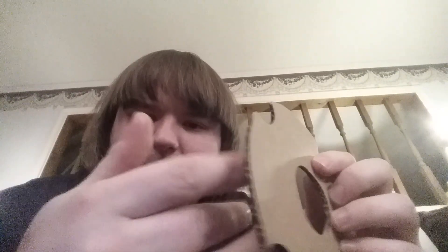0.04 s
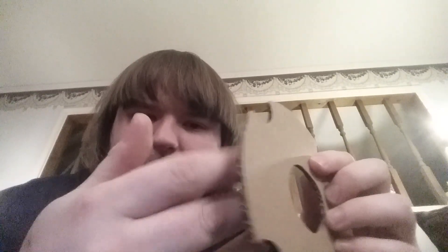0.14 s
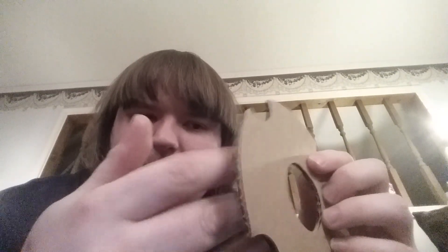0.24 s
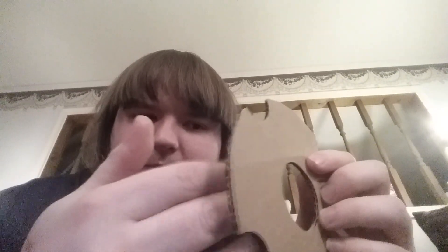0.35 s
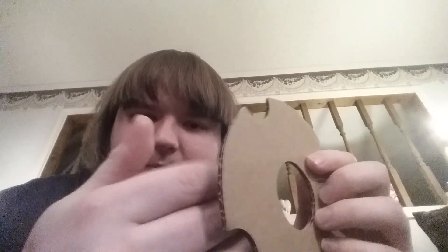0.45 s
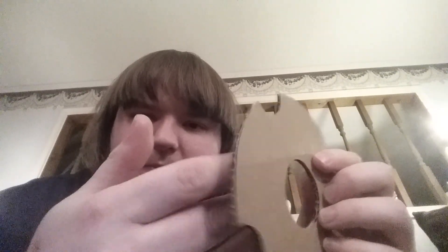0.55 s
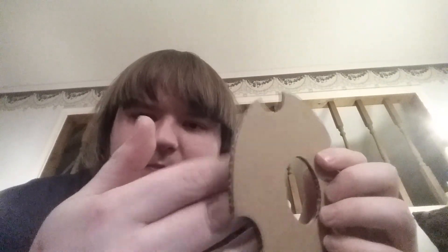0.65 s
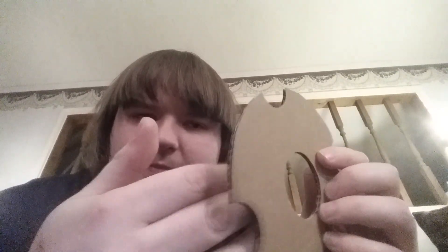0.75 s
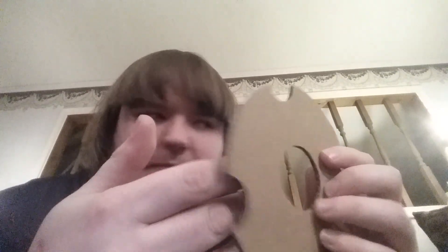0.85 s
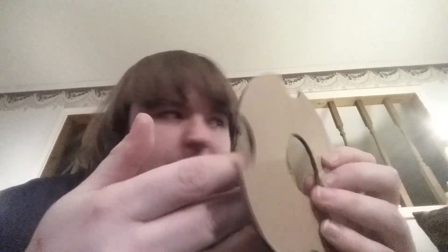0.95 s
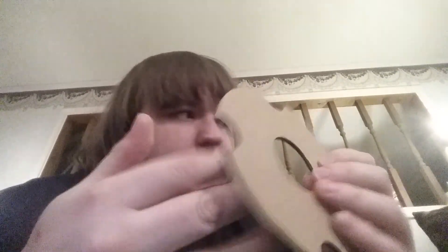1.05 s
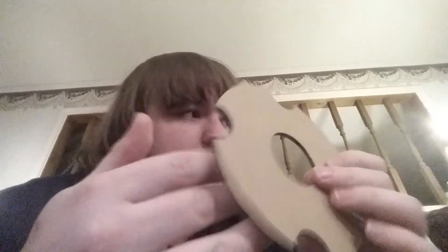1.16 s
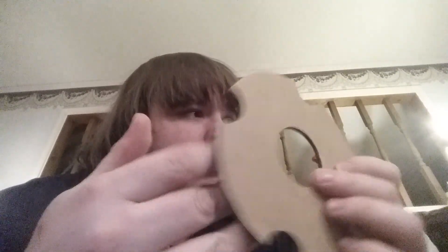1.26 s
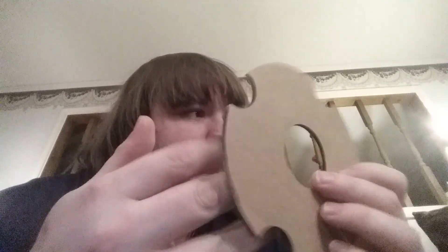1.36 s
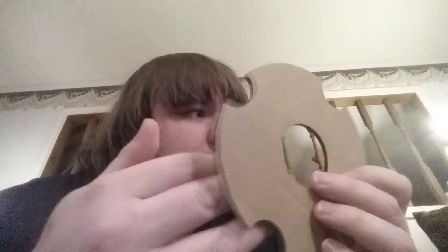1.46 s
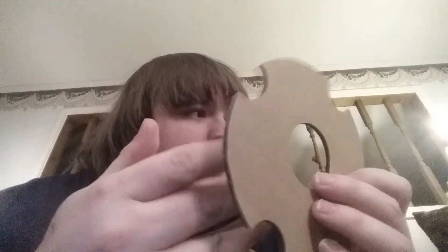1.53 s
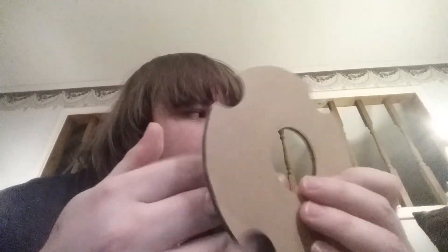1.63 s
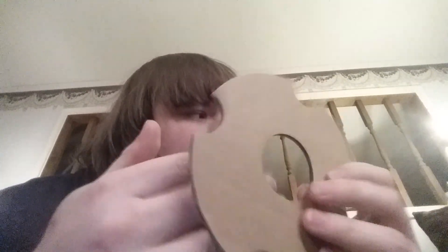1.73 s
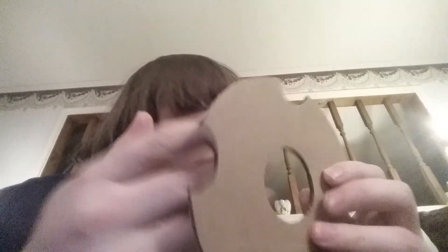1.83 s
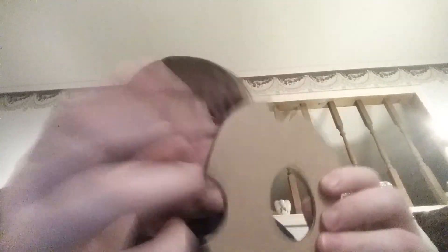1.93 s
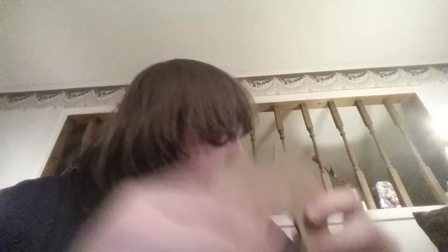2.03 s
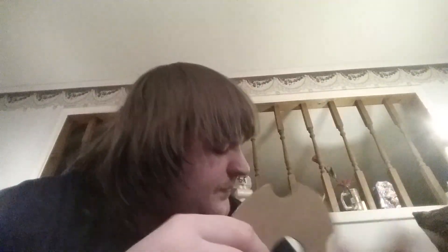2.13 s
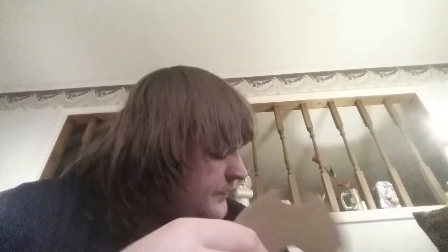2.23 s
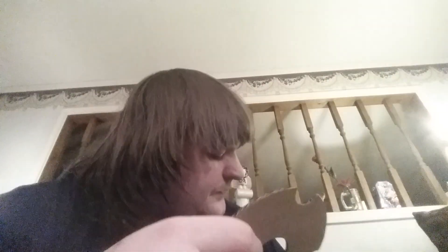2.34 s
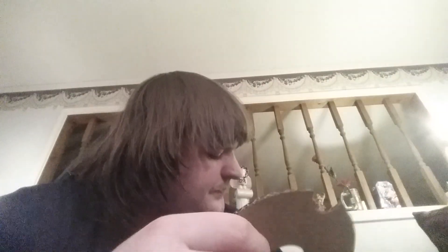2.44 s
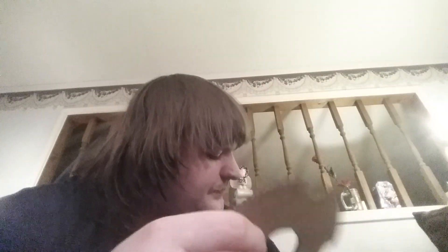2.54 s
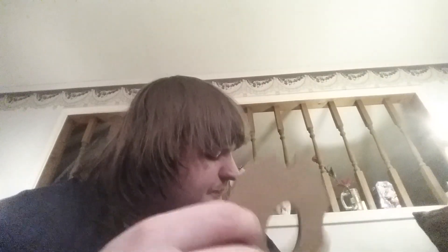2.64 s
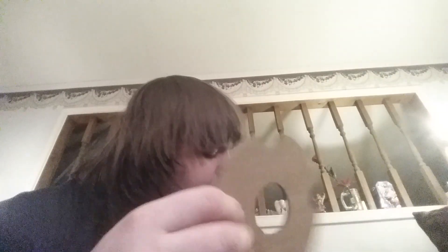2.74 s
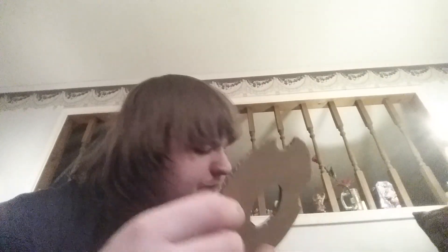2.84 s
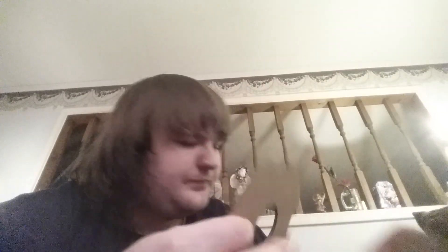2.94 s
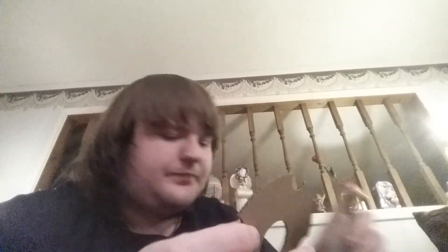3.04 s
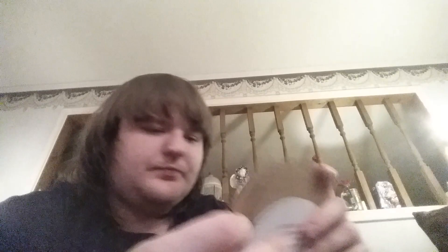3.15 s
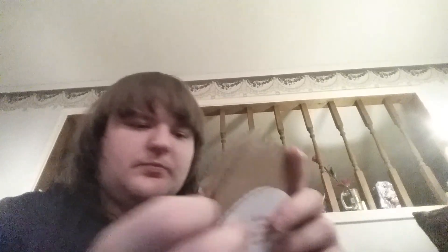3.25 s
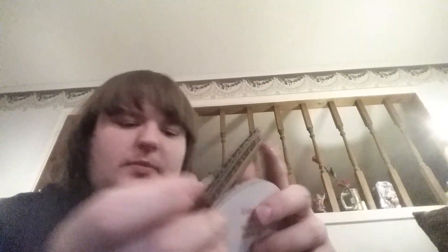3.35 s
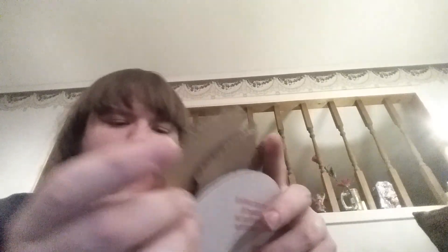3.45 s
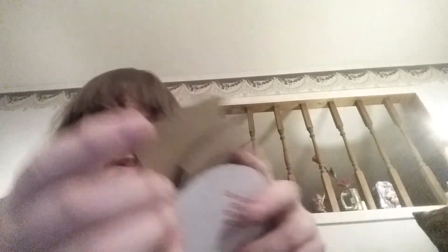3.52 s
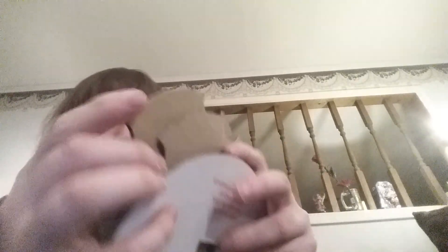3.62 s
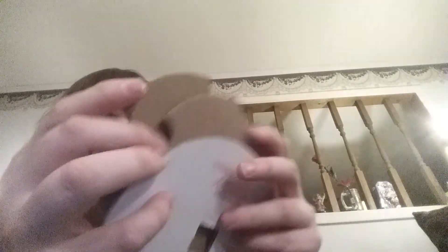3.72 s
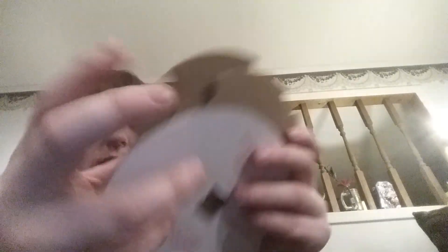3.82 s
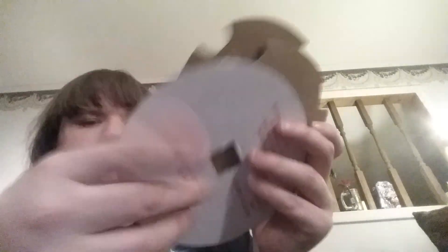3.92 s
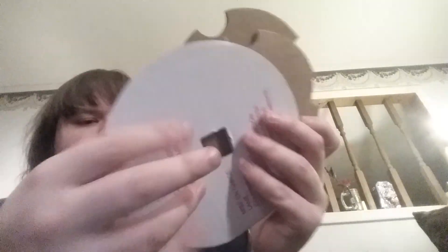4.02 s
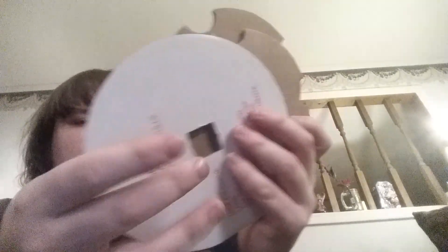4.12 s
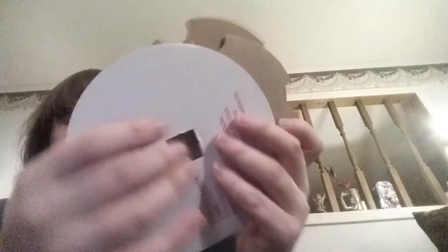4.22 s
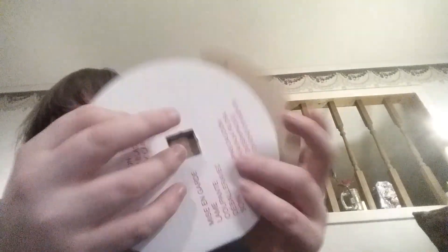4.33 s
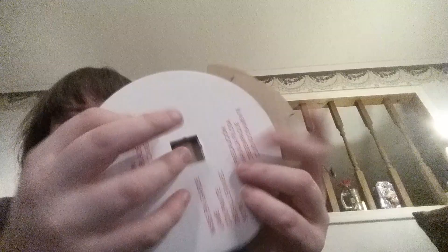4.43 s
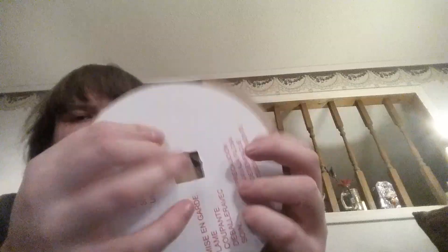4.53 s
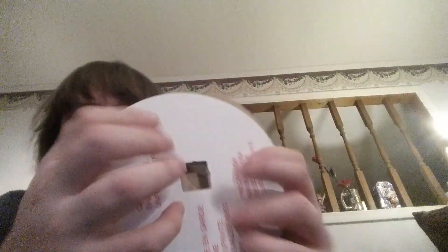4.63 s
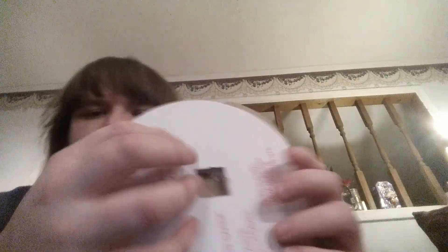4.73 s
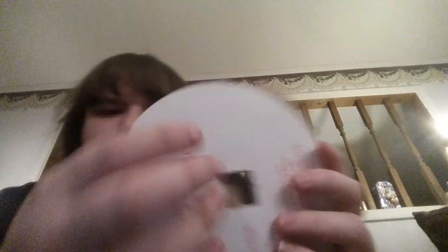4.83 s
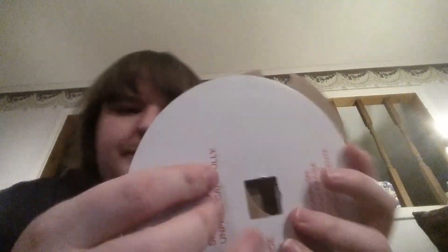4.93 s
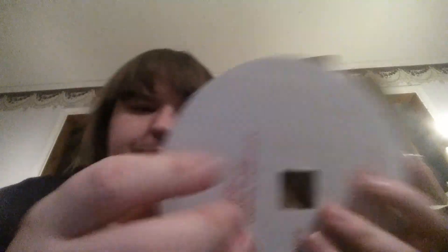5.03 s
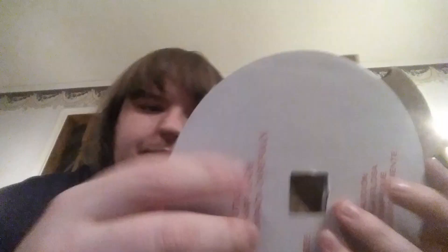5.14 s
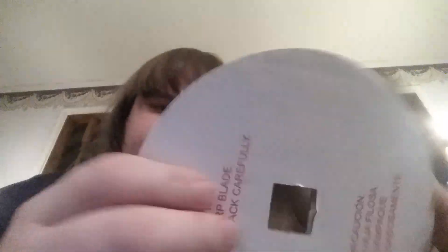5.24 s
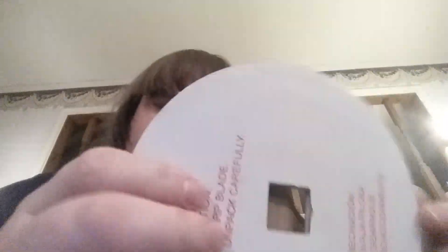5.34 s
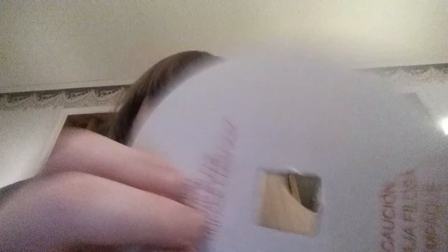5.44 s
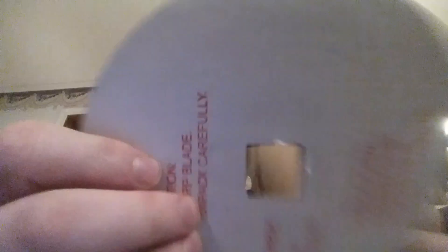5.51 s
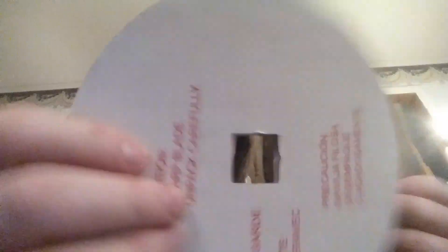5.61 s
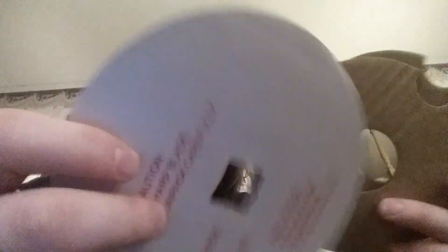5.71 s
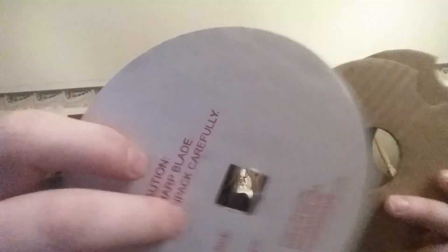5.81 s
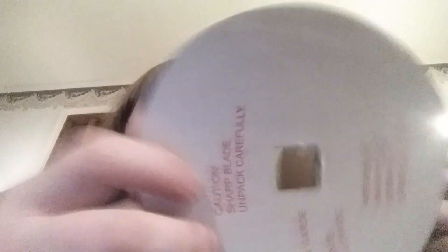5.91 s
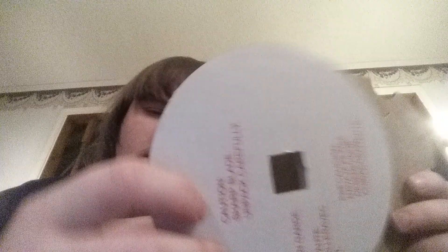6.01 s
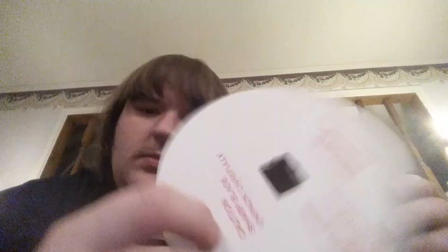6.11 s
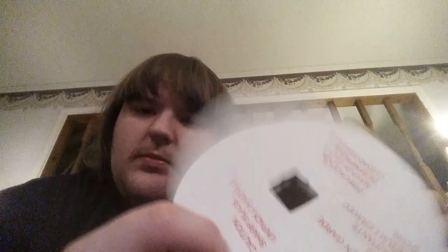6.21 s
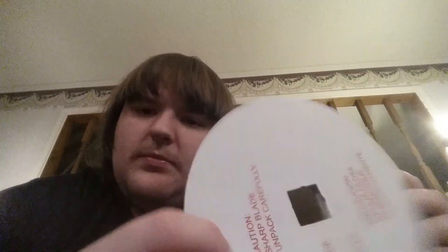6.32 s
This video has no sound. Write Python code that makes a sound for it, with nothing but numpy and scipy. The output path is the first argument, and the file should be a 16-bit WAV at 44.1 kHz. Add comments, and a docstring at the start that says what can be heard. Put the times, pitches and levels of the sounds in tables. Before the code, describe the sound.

First, fast uneven nail taps on stiff card, each very short and woody with a sharp click. Then a soft thump, light brushing, and a sudden clack as discs are picked up. Papery sliding, hollow rubbing and clustered knocks follow, louder and rougher. Close-miked, stronger and earlier on the left, duller on the right, with little room reverberation.

```python
"""A quiet room: fingernails drum on a cardboard disc held near two unlike microphones.
Then the hands pick up a stack of discs, which slide, scuff and knock against each other.
Taps and knocks sum decaying card modes, a slow flex and a noise tick; sliding is grainy shaped noise,
hollow at times. Room reflections and steady air noise lie behind, and each microphone adds its colour."""
import sys
import numpy as np
from scipy import signal
from scipy.fft import rfft, irfft
from scipy.io import wavfile
from scipy.ndimage import uniform_filter1d

SR = 44100
rng = np.random.default_rng(int(sys.argv[2]) if len(sys.argv) > 2 else 0)


def waveform_to_disk(signal):
    """Save audio, clipped to [-1, 1], as 16-bit WAV at the path in sys.argv[1]."""
    frames = np.transpose(np.atleast_2d(signal))
    scaled = np.clip(frames, -1, 1) * 32767
    samples = np.round(scaled).astype(np.int16)
    wavfile.write(sys.argv[1], SR, samples)


N = 280872  # length of the scene in samples


def gain_of(db):
    """Turn decibels into an amplitude factor."""
    return 10 ** (np.asarray(db) / 20)


def evened(x):
    """Scale a signal to an RMS of one."""
    return x / np.sqrt(np.mean(x ** 2) + 1e-20)


def read(points, hz):
    """Read a table of (Hz, value) along a logarithmic frequency axis."""
    f, value = np.transpose(points)
    return np.interp(np.log(hz + 1), np.log(f + 1), value)


def over_time(points, t):
    """Read a table of (seconds, value) along straight lines."""
    return np.interp(t, *np.transpose(points))


def add(mix, s, sound):
    """Lay a two-channel sound into the mix at s seconds, cut at the end of the scene."""
    part = mix[:, round(s * SR):][:, :sound.shape[1]]
    part += sound[:, :part.shape[1]]


# How alike the two microphone ports hear a sound. Each row: frequency in Hz, likeness from 0 to 1.
PORT_LIKENESS = [(100, 1), (700, .9), (2000, 0.34), (5000, 0.17)]


def pair(a, b):
    """Left is a; right shares a by the likeness of the ports and takes the rest from b."""
    same = np.clip(read(PORT_LIKENESS, np.fft.rfftfreq(len(a), 1 / SR)), 0, 1)
    right = same * rfft(a) + np.sqrt(1 - same ** 2) * rfft(b)
    return np.array([a, irfft(right, len(a))])


def noise(colour, patchy_db):
    """Two-port noise from random short-time spectra with drifting patches, scaled to an RMS of one."""
    hz = np.fft.rfftfreq(512, 1 / SR)
    a, b, c, d, patches = rng.standard_normal((N // 128 + 5, 257, 5)).T
    patches = uniform_filter1d(patches, size=12, axis=0)  # smooth over frequency
    patches = evened(uniform_filter1d(patches, size=9, axis=1))  # and over time
    spectra = np.array([a + 1j * b, c + 1j * d])
    spectra = spectra * gain_of(read(colour, hz)[:, None] + patchy_db * patches)
    ports = signal.istft(spectra, nperseg=512, noverlap=384)[1][:, :N]
    return evened(pair(*ports))


BLOW_LENGTH = 4096  # samples
CHANCES = 72 + 2 * BLOW_LENGTH  # random numbers for one blow: 72 for the modes, the rest for the tick


def card_ring(modes_hz, decay, manner, ring_hz, chance):
    """Close, heavily damped card modes, rung unevenly by where the card is hit, strongest near ring_hz."""
    t = np.arange(BLOW_LENGTH) / SR
    loose, spread_db, lead, scatter_s = manner
    spot, detune, other = chance[:72].reshape(3, 24, 1)[:, :len(modes_hz) + 1]
    hz = np.append(ring_hz, modes_hz * (1 + loose * detune[1:, 0]))[:, None]
    share = np.append(lead, 1 + 0.7 * np.tanh(spot[1:]))[:, None]
    distance_db = spread_db * np.log2(hz / ring_hz) ** 2
    fade = share * gain_of(-distance_db - 60 * t / read(decay, hz))
    turn = 2 * np.pi * hz * t
    left = (fade * np.sin(turn)).sum(0)
    unlike = (fade * np.sin(turn + .5 * other)).sum(0) * (1 - np.exp(-t / 0.0032))
    # the faces meet again in a few more places
    contacts = 0.7 * (abs(chance[72:584]) > 2.3) * np.exp(-t[:512] / scatter_s)
    contacts[0] = 1
    return signal.oaconvolve(pair(left, unlike), contacts[None], axes=1)[:, :BLOW_LENGTH]


def card_flex(flex_hz, detune):
    """The card bends slowly as a whole and loses 60 dB in about three cycles."""
    t = np.arange(BLOW_LENGTH) / SR
    flex = np.sin(2 * np.pi * flex_hz * t * [[1], [1 + 0.29 * detune]])
    return flex * gain_of(-60 * t * flex_hz / 2.98) * (1 - np.exp(-t / 0.0015))


def contact_tick(scatter_s, grit):
    """High-passed noise: a short burst, a weaker tail, and a faint rustle until the finger leaves."""
    t = np.arange(BLOW_LENGTH) / SR
    rustle = 0.01 / (1 + np.exp((t - .05) / 0.0027))  # ends near 50 ms
    burst = (1 - np.exp(-t / 0.00031)) * gain_of(-60 * t / (0.0018 + 1.15 * scatter_s))
    burst = burst + 0.35 * gain_of(-60 * t / 0.015)
    b, a = signal.butter(2, 3300, "high", fs=SR)
    return pair(*signal.lfilter(b, a, grit.reshape(2, -1) * (burst + rustle)))


def blow(modes_hz, decay, manner, sign, ring_db, flex_db, tick_db, flex_hz, ring_hz, chance):
    """One contact: ring, flex and tick, each set to its peak level in the near port."""
    ring = card_ring(modes_hz, decay, manner, ring_hz, chance)
    flex = card_flex(flex_hz, chance[71])
    tick = contact_tick(manner[3], chance[72:])
    parts = (ring_db, sign * ring), (flex_db, sign * flex * [[1], [.9]]), (tick_db, tick)
    return sum(gain_of(level_db) * part / abs(part[0]).max() for level_db, part in parts)


# Fingers on the single disc, close to the microphones. Each row: start in seconds, ring level in dB,
# flex level in dB, nail tick level in dB, frequency of the lead mode in Hz.
FINGER_TAPS = [(0.0822, -22.5, -36, -19.5, 807), (0.1101, -14.5, -23.5, -11, 678),
               (0.1987, -15.5, -24.5, -13, 872), (0.2335, -14.5, -35, -9, 839),
               (0.3237, -16, -25, -15, 829), (0.3473, -14, -21, -12.5, 538), (0.3697, -10, -26, -9.5, 882),
               (0.4517, -15, -30, -16, 430), (0.4599, -13, -35, -10.5, 490),
               (0.4841, -17, -13.5, -14.5, 527), (0.511, -11, -34, -12, 900),
               (0.5775, -10.5, -43, -12.5, 400), (0.5957, -11.5, -28, -9, 850),
               (0.6209, -23, -18.5, -20, 500), (0.6474, -10.5, -28, -5, 930), (0.7258, -16, -38, -18, 419),
               (0.7372, -14.5, -29, -14, 839), (0.7668, -30, -21, -25, 500), (0.7907, -8, -23, -8, 915),
               (0.8557, -13, -23, -12, 380), (0.8932, -17, -26, -20, 495), (0.9423, -7.5, -17.5, -8.5, 516),
               (0.9961, -10, -27, -14, 775), (1.0416, -19.5, -20, -15.5, 462),
               (1.1708, -17, -26, -11, 1230), (1.197, -17.5, -31, -11.5, 470),
               (1.2796, -13.5, -25, -17.5, 400), (1.3272, -11, -24, -8.5, 600),
               (1.3401, -11.5, -48, -8.5, 480), (1.4055, -15, -25, -17, 300), (1.4578, -24, -17, -25, 300),
               (1.4995, -8.5, -43, -10, 904), (1.579, -20.5, -24, -27, 450),
               (1.6001, -23.5, -17.5, -25.5, 300), (1.6283, -8.5, -40, -9, 893),
               (1.7255, -11.5, -45, -16, 280), (1.7516, -18.5, -20, -20, 279),
               (1.7717, -13, -21, -12.5, 460), (1.8424, -25.5, -23, -19.5, 1200),
               (1.8918, -31, -22.5, -24, 300), (1.9314, -10.5, -22.5, -10, 570),
               (2.1273, -22, -24, -23.5, 590), (2.1734, -18, -25, -17.5, 1744)]
# How fast the disc dies away. Each row: frequency in Hz, time to fall 60 dB in seconds.
DISC_DECAY = [(250, 0.034), (900, 0.016), (4500, 0.0055)]
# The modes of the disc before each tap detunes them, in Hz.
DISC_MODES = [300, 480, 670, 860, 1190, 1480, 1950, 2180, 2800, 3300, 4200]
# How a tap excites the disc. In order: looseness of the modes' pitch as a fraction, loss in dB one octave
# from the lead mode (growing with the square of octaves), strength of the lead mode,
# time constant of later contacts in seconds.
DISC_MANNER = (.04, 1.1, 1.7, .00035)
DISC_FLEX_HZ = 185  # centre; each tap varies it by up to a quarter


def finger_taps():
    """Single clean contacts of the nails, each ringing and flexing the one disc."""
    out = np.zeros((2, N))
    chances = rng.standard_normal((len(FINGER_TAPS), CHANCES))
    for (s, *levels_db, ring_hz), chance in zip(FINGER_TAPS, chances):
        flex_hz = DISC_FLEX_HZ * (1 + 0.25 * np.tanh(chance[0]))
        add(out, s, blow(DISC_MODES, DISC_DECAY, DISC_MANNER, 1, *levels_db, flex_hz, ring_hz, chance))
    return out


# Discs and fingers knocking in the stack. Each row: start in seconds, ring level in dB, flex level in dB,
# tick level in dB, flex frequency in Hz, frequency around which the blow rings most in Hz.
STACK_KNOCKS = [(2.021, -9.5, -7, -18, 135, 549), (2.0498, -28, -9, -24, 120, 600),
                (2.0714, -28.5, -38, -8, 75.0, 2250), (2.5718, -30, -36, -35, 151.0, 480),
                (2.9781, -17, -19, -14, 190, 968), (3.2, -25.5, -26, -20.5, 160, 1160),
                (3.2614, -18.5, -25, -20, 352, 1130), (3.3702, -3.5, -22, -13, 133, 1248),
                (3.7733, -7, -30, -4, 480, 1400), (3.871, -21, -30, -19, 97.0, 780),
                (3.8925, -11, -16, -20, 208, 750), (4.0492, -17.0, -14.5, -13, 100, 1050),
                (4.0551, -12, -31, -19, 167, 1450), (4.064, -11, -4.5, -21, 146, 1030),
                (4.3478, -10, -11, -11.5, 151.0, 1120), (4.5179, -17.5, -53, -38, 388.0, 1800),
                (4.5255, -17, -50, -28, 300, 1210), (4.5345, -14, -50, -28, 300, 1200),
                (4.5612, -18, -19.5, -28, 86.0, 1200), (4.574, -16, -27, -21, 97.0, 1150),
                (4.6241, -15.5, -10.5, -15, 128, 1010), (4.6673, -16.5, -40, -17, 75.0, 1250),
                (4.7709, -19.5, -13, -18, 122, 1470), (4.8356, -16, -37.0, -4.5, 334.0, 2020),
                (4.9948, -15.0, -14, -30, 98, 1370), (5.0304, -22, -7.5, -16.5, 138, 830),
                (5.1847, -27, -15.5, -34, 105, 1230), (5.2215, -27, -9.5, -14.5, 123, 1560),
                (5.5758, -11.5, -30, -9.5, 86.0, 839), (5.7821, -10, -5.5, -16, 153, 460),
                (5.829, -12.5, -19, -29, 170, 1340), (5.877, -16.5, -12, -39, 152, 980),
                (6.05, -13, -29, -15, 242.0, 1400), (6.0896, -6, -27, -20, 420, 720),
                (6.1876, -8.5, -17, -10.5, 430, 900), (6.2444, -17, -24, -22, 168, 581),
                (6.2535, -17, -20, -30, 380, 600), (6.325, -9, -14, -6.5, 370, 1100)]
# How fast the stack dies away. Each row: frequency in Hz, time to fall 60 dB in seconds.
STACK_DECAY = [(250, 0.058), (900, 0.019), (4500, 0.0069)]
STACK_MODES = np.geomspace(240, 4500, 23)  # Hz, before each knock detunes them
# How a knock excites the stack, in the same order as for the disc.
STACK_MANNER = (.062, 4.2, 2.8, .0035)
# Between these times the stack moves away from the microphones on each knock.
TURNED_FROM_S, TURNED_UNTIL_S = 2.3, 5.7


def stack_knocks():
    """Clusters of contacts in the stack; the sign of ring and flex follows the way the stack moves."""
    out = np.zeros((2, N))
    chances = rng.standard_normal((len(STACK_KNOCKS), CHANCES))
    for (s, *row), chance in zip(STACK_KNOCKS, chances):
        sign = -1 if TURNED_FROM_S < s < TURNED_UNTIL_S else 1
        add(out, s, blow(STACK_MODES, STACK_DECAY, STACK_MANNER, sign, *row, chance))
    return out


# Strokes of skin or card over card. Each row: peak in seconds, level in dB, seconds to swell 20 dB,
# seconds to fade 20 dB.
SLIDE_STROKES = [(1.05, -38.4, 0.5, 0.08), (1.87, -39.9, 0.12, 0.26), (2.052, -31.0, 0.05, 0.02),
                 (2.181, -35.5, 0.04, 0.04), (2.49, -51.1, 0.3, 0.06), (2.771, -37.5, 0.089, 0.04),
                 (2.836, -35.5, 0.2, 0.04), (3.034, -25.0, 0.095, 0.062), (3.205, -35.6, 0.053, 0.029),
                 (3.276, -33.2, 0.072, 0.501), (3.403, -20.2, 0.127, 0.062), (3.5, -30.5, 0.169, 0.461),
                 (3.677, -23.3, 0.021, 0.09), (3.768, -25.7, 0.038, 0.089), (3.885, -29.5, 0.298, 0.092),
                 (4.076, -30.5, 0.104, 0.095), (4.359, -30.7, 0.143, 0.147), (4.521, -26.3, 0.022, 0.182),
                 (4.675, -27.4, 0.11, 0.097), (4.802, -27.3, 0.061, 0.027), (4.838, -30.7, 0.013, 0.307),
                 (4.926, -27.3, 0.142, 0.168), (5.091, -26.5, 0.107, 0.065), (5.38, -31.5, 0.526, 0.045),
                 (5.463, -29.0, 0.025, 0.03), (5.543, -26, 0.14, 0.019), (5.599, -30.8, 0.099, 0.143),
                 (5.718, -33.4, 0.081, 0.077), (5.821, -23.4, 0.074, 0.044), (5.907, -37.6, 0.081, 0.6),
                 (6.039, -29.4, 0.219, 0.143), (6.251, -42.8, 0.6, 0.432)]
# Faint creep of the fingers that hold the card. Each row: time in seconds, level in dB.
GRIP_CREEP = [(0, -70), (1.1, -54), (1.85, -53), (2.1, -75), (2.9, -62), (4.5, -58), (6.37, -52)]
# Short hard scuffs of edge on face. Each row: peak in seconds, level in dB,
# seconds from the peak to 1/e on either side.
EDGE_SCUFFS = [(3.038, -30, 0.008), (3.396, -20, 0.0032), (3.4375, -28, 0.0008), (5.38, -32, 0.0036),
               (5.47, -26, 0.0036)]
# Colour of the hiss. Each row: frequency in Hz, relative level in dB.
HISS_COLOUR = [(300, -15.5), (1000, -8.5), (3500, -6), (16000, 3)]
# Colour of the card body. Each row: frequency in Hz, relative level in dB.
BODY_COLOUR = [(40, 22), (130, 12), (300, 3.5), (1250, 3), (2500, -2), (4500, -0.5), (9000, -9)]
# How much the card body sounds under the hiss, more once the discs lie together.
# Each row: time in seconds, level in dB over the hiss when sliding is at -40 dB.
BODY_LEVEL = [(2.4, -5), (3.7, -4.5), (3.9, -1.5), (5.3, -1.5), (5.6, 0.5), (5.72, -4.5), (6.3, 0)]
BODY_LAG = .22  # dB that the body falls behind for each dB of faster sliding, once the stack has turned


def sliding():
    """Fibres catch and slip: a finely grained hiss, and the card body sounding under it."""
    t = np.arange(N) / SR
    power = gain_of(over_time(GRIP_CREEP, t)) ** 2
    for at, db, swell, fade in SLIDE_STROKES:
        drop_db = 20 * np.maximum((at - t) / swell, (t - at) / fade)
        power = power + gain_of(db - drop_db) ** 2
    lag_db = BODY_LAG * (10 * np.log10(power) + 40) * (t > TURNED_FROM_S)
    body_db = over_time(BODY_LEVEL, t) - lag_db
    level = np.sqrt(power)
    for at, db, length in EDGE_SCUFFS:
        level = level + gain_of(db) * np.exp(-((t - at) / length) ** 2)
    # about 500 catches a second of uneven strength, each fading over 0.6 ms
    strength = gain_of(4.2 * np.minimum(rng.exponential(1, N), 3))
    catches = strength * (rng.random(N) < 500 / SR)
    grain = evened(1 + .6 * signal.lfilter([1], [1, -np.exp(-1 / (.0006 * SR))], catches))
    judder = gain_of(1.65 * evened(uniform_filter1d(rng.standard_normal(N), size=500)))
    hiss = grain * noise(HISS_COLOUR, patchy_db=2.5)
    body = gain_of(body_db) * np.sqrt(grain) * noise(BODY_COLOUR, patchy_db=3.5)
    return judder * (level * (hiss + body) + hollow_gaps(level))


# The gap between two sliding discs sounds hollow. Each row: start in seconds, end in seconds,
# resonance in Hz, width in Hz, level in dB over the sliding level.
HOLLOW_GAPS = [(3.781, 3.926, 1370, 400, -7), (4.35, 4.7, 1180, 198, -6), (5.481, 6.07, 1790, 220, -10)]


def hollow_gaps(level):
    """Grainy noise through the resonance of the gap, while it lasts."""
    out = np.zeros((2, N))
    for start, end, hz, width, db in HOLLOW_GAPS:
        n = round((end - start) * SR)
        rasp = rng.standard_normal((2, n))
        rasp = rasp * gain_of(4.0 * evened(uniform_filter1d(rng.standard_normal(n), size=120)))
        tone = signal.lfilter(*signal.iirpeak(hz, hz / width, SR), pair(*rasp))
        add(out, start, gain_of(db) * evened(tone) * signal.windows.tukey(n, .5))
    return level * out


# How fast the room dies away. Each row: frequency in Hz, time to fall 60 dB in seconds.
ROOM_DECAY = [(300, 0.14), (10000, 0.11)]
ROOM_DB = -21  # energy of the near port's reflections against the direct sound


def room(x):
    """Sparse reflections of random sign after 6 ms, each band dying at its own speed."""
    taps = np.zeros((2, SR // 4))
    slots = np.arange(260, SR // 4 - 20, 20)  # one reflection in every 20 samples
    at = slots + rng.integers(0, 20, (2, len(slots)))
    np.put_along_axis(taps, at, rng.choice([-1., 1.], (2, len(slots))), 1)
    hz, t, z = signal.stft(taps, SR, nperseg=128)
    fade = gain_of(-60 * t / read(ROOM_DECAY, hz)[:, None])
    tail = signal.istft(z * fade, SR, nperseg=128)[1]
    tail = gain_of(ROOM_DB) * tail / np.linalg.norm(tail[0])
    return signal.fftconvolve(x[None], tail, axes=1)[:, :N]


# Colour of the quiet air. Each row: frequency in Hz, relative density in dB per Hz.
AIR_COLOUR = [(18, -36), (30, 3), (93, 6.5), (1190, -29), (12600, -45), (16000, -29)]
AIR_DB = -54.5  # RMS before the microphones


def air():
    """Steady background noise, mostly low, with slightly drifting patches."""
    return gain_of(AIR_DB) * noise(AIR_COLOUR, patchy_db=-1.0)


# Where the hands are. Each row: time in seconds, extra shading of the far microphone in dB.
FAR_SHADE = [(.3, 8), (1.6, 10), (2.3, 6), (3.0, 3), (3.6, 7), (4.8, 1), (5.2, 7.5)]
FAR_DELAY_S = 0.0002947  # sound travels about a tenth of a metre farther to the far microphone


def scene():
    """Hands and card reach the far microphone later and shaded; room and air lie behind."""
    near = finger_taps() + stack_knocks() + sliding()
    delay = np.exp(-2j * np.pi * np.fft.rfftfreq(N, 1 / SR) * FAR_DELAY_S)
    near[1] = irfft(rfft(near[1]) * delay, N)
    near[1] /= gain_of(over_time(FAR_SHADE, np.arange(N) / SR))
    return near + room(near[0]) + air()


# Colour of the near microphone and its port. Each row: frequency in Hz, gain in dB.
NEAR_MIC_COLOUR = [(30, -18.5), (80, -6), (3000, 6.5), (5300, 2.5), (7000, 9.5), (9200, -1), (12500, 4),
                   (16000, -4.5)]
# Colour of the far microphone and its port. Each row: frequency in Hz, gain in dB.
FAR_MIC_COLOUR = [(30, -21), (80, -8.5), (600, -5), (2500, -3), (6300, -9), (8500, 1), (10500, 11),
                  (12400, 4.5), (13800, -3), (16000, 2)]
BAND_LIMIT_HZ = 15900


def record(dry):
    """Each microphone colours causally with its own port resonance; then full scale and the band limit."""
    hz = abs(np.fft.fftfreq(8192, 1 / SR))
    log_gain = np.log(gain_of([read(NEAR_MIC_COLOUR, hz), read(FAR_MIC_COLOUR, hz)]))
    # the Hilbert transform of the log gain gives the minimum phase
    spectrum = np.exp(np.conj(signal.hilbert(log_gain)))
    colour = np.fft.ifft(spectrum).real[:, :4096]
    heard = signal.oaconvolve(dry, colour, axes=1)[:, :N]
    edge = signal.firwin(511, BAND_LIMIT_HZ, window=("kaiser", 11), fs=SR)
    return signal.oaconvolve(np.clip(heard, -1, 1), edge[None], "same")


dry = scene()
out = record(dry)
waveform_to_disk(out)
```